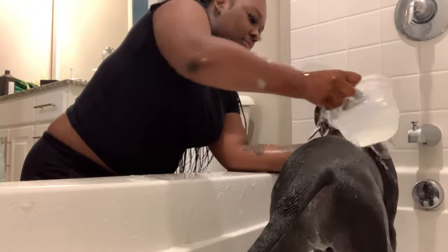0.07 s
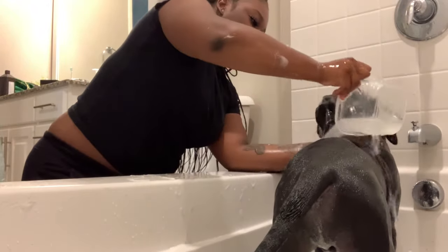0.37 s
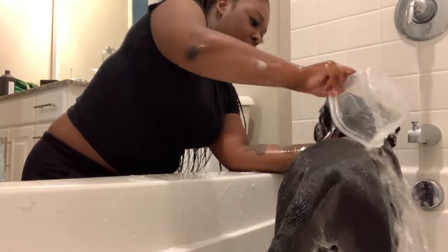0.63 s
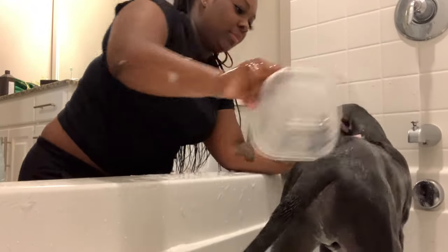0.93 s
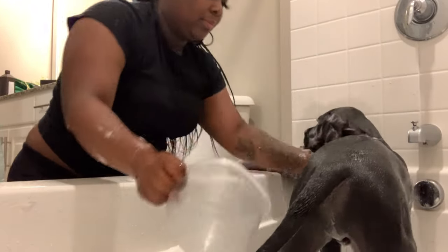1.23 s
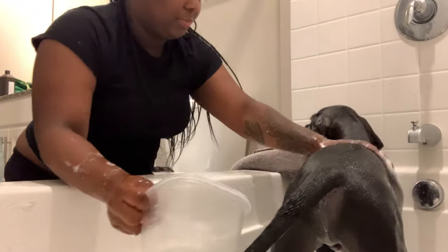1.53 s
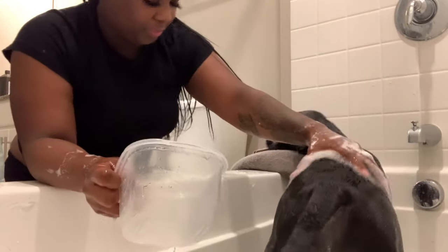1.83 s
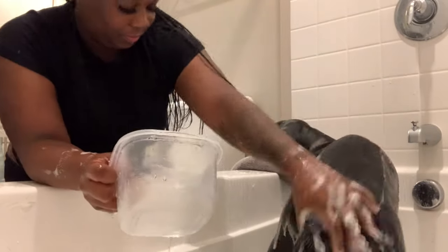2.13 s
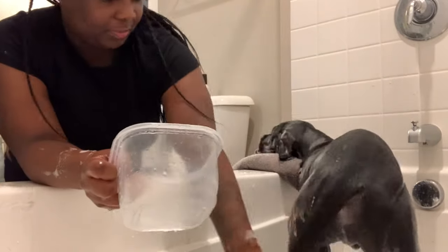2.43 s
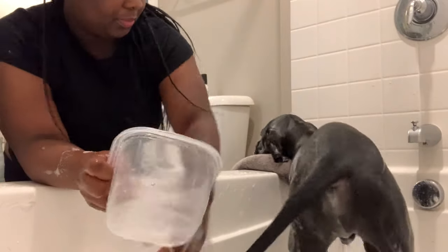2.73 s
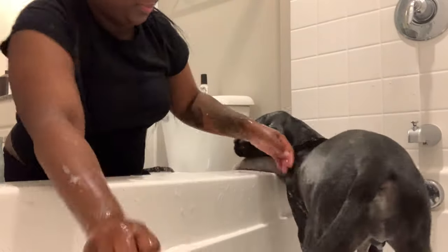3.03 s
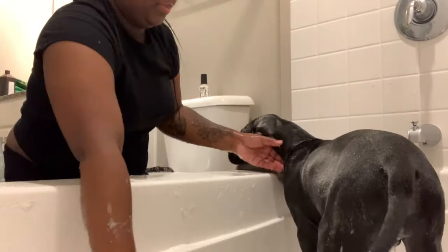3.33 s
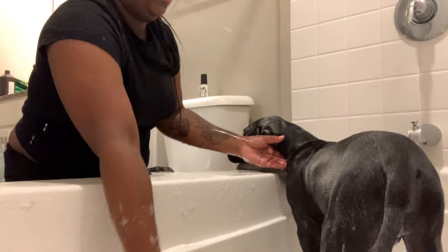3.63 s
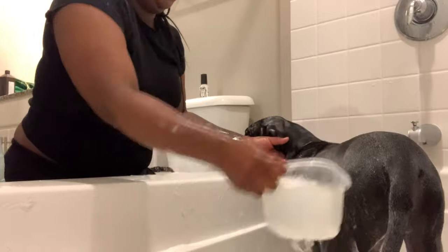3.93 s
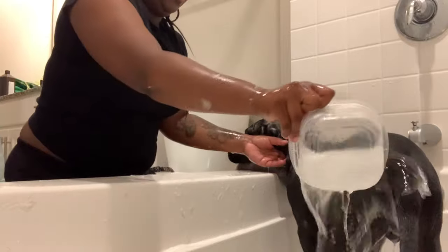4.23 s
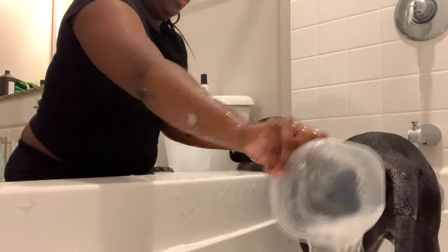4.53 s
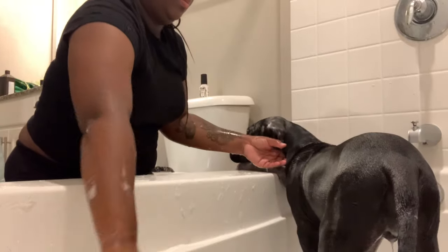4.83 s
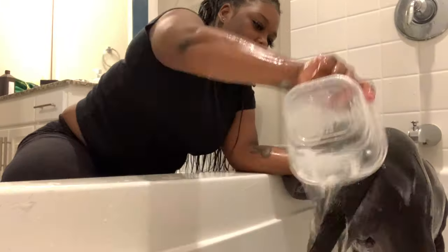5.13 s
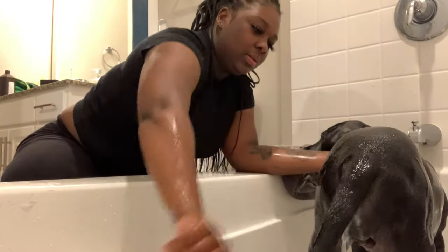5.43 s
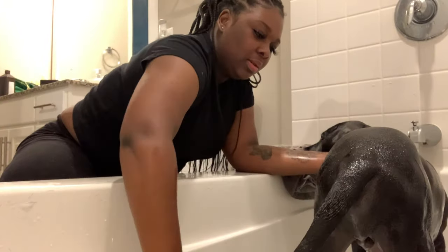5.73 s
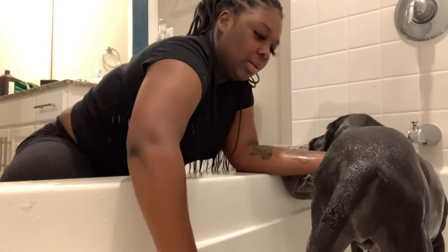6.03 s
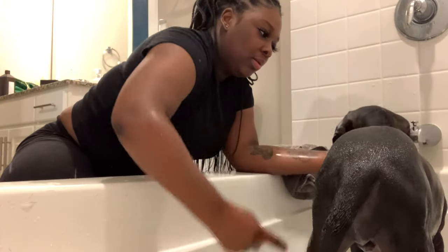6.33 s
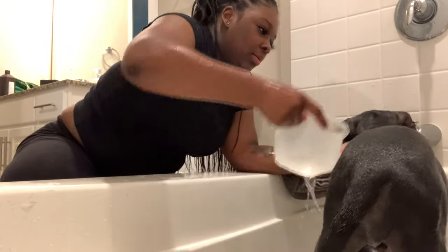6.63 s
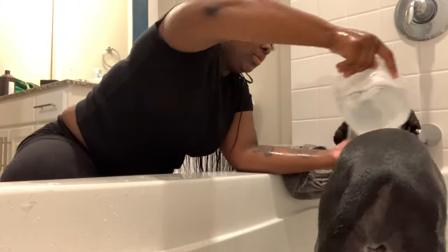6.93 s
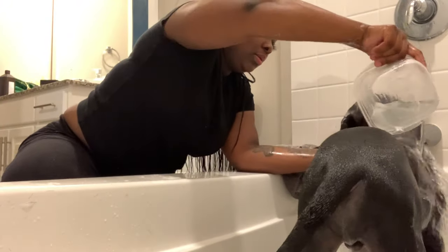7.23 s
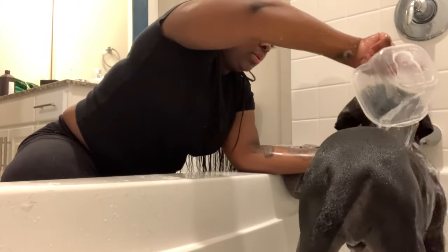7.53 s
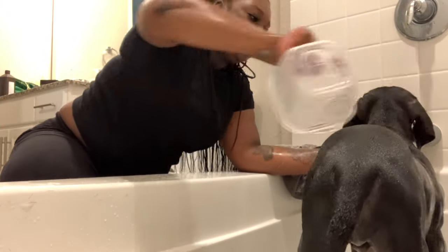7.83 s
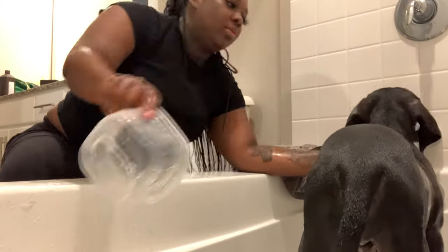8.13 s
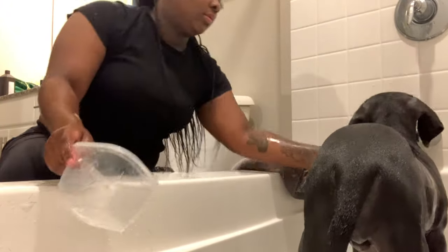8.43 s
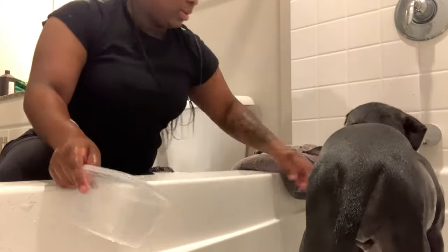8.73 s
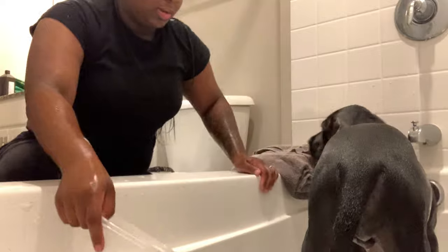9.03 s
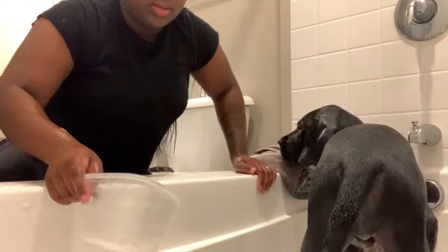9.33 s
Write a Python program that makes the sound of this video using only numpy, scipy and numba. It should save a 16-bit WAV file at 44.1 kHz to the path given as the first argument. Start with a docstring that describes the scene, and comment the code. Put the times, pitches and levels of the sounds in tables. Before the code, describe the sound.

In a small tiled bathroom, a dog is rinsed with three scoopfuls of water, each splashing into the tub with bubbles and fine spray. Between pours come sloshes, plopping drops, light plastic taps and hollow thumps against the bath. From about halfway, the drain gurgles in its pipe. Water trickles off the coat throughout over a steady low rumble of air, picked up close by at the side of the tub.

```python
"""A dog is rinsed in a bathtub in a small tiled room, where the air rumbles and water trickles off its coat.
At 0.4 s a plastic scoop pours water over it: bubbles gurgle and splatter, spray fizzes, the bath drums.
Then a hand and the scoop plunge in, drops plop and tap, and the bumped bath booms. A second pour comes
at 4.2 s, and the level dips briefly at 5 s. By 5.4 s the drain is gulping and ringing its pipe; a last
pour follows at 7 s. Two microphone ports listen from the side of the bath."""
import sys
import numpy as np
from scipy import signal
from scipy.fft import rfft, irfft, next_fast_len
from scipy.io import wavfile
from scipy.ndimage import map_coordinates
from numba import njit

SR = 44100
rng = np.random.default_rng(int(sys.argv[2]) if len(sys.argv) > 2 else 0)


def log_audio(samples):
    """Write samples as a 16-bit WAV file to the path given in sys.argv[1]."""
    # one column per channel
    frames = np.atleast_2d(samples).T
    # limit to full scale, then quantise
    limited = np.clip(frames, -1, 1)
    pcm = np.round(limited * 32767).astype(np.int16)
    wavfile.write(sys.argv[1], SR, pcm)


N = 422478

# tone of the room's air: f/Hz, level/dB
AIR_TONE = [(42, -14), (58, 12), (95, -5), (130, -1.5), (230, -24.5), (900, -8), (1250, -36), (2000, -33),
            (6000, -27), (15000, -32)]
# echo of the tiles: f/Hz, t60/s (t60 is the time a sound takes to fade by 60 dB)
TILE_ECHO = [(100, 0.4), (500, 0.33), (3000, 0.17), (14000, 0.058)]
# notes at which the waste pipe rings: f/Hz, width/Hz, level/dB
PIPE_NOTES = [(154.5, 20, 1), (374.6, 34, -7.5), (488.5, 32, -9), (719, 28, -7), (924, 36, -20),
              (1960, 35, -21)]
# notes at which the bath's shell rings: f/Hz, width/Hz, level/dB
BATH_NOTES = [(59.5, 6.4, 2.5), (97.4, 10.2, 3), (124, 27, -4), (166, 37, -4), (260, 20.5, -5.5),
              (365, 54, -11), (501.5, 18, -9), (734, 50, -12.5)]
# a paw or the scoop bumps the bath: t/s, level/dB, f/Hz
BATH_BUMPS = [(2.21, -24.5, 92.4), (2.437, -20, 83), (4.884, -9, 101.3), (4.95, -15, 110),
              (6.345, -18, 158), (6.594, -22, 173), (7.21, -16.5, 64.4), (8.818, -21, 96)]
# sharp taps of drops and plastic: t/s, level/dB, f/Hz, bright crack/0-1
SHARP_TAPS = [(.419, -12, 4040, 0), (1.676, -30, 1490, 0.5), (3.1, -17, 770, 0.02),
              (3.163, -32, 1500, 0.95), (3.177, -18, 1900, 0.2), (3.5056, -14.5, 1930, 0.01),
              (3.927, -36, 1200, 0.84), (4.8153, -11, 1520, 0.02), (4.849, -18.5, 1880, 0.21),
              (5.273, -8.5, 2370, 0.04), (5.557, -5, 2400, 0.02), (5.787, -9.5, 3070, 0.02),
              (6.379, -17.5, 4170, 0.4), (6.542, -14.5, 2040, 0.09), (7.018, -13.5, 2600, 0.07),
              (7.052, -8.5, 2630, 0.04), (8.258, -28, 2714, 0.26), (9.085, -38, 1390, 0.6),
              (9.335, -21.5, 1870, 0.2)]
# the largest single drops: t/s, level/dB, f/Hz
BIG_DROPS = [(.048, -22, 850), (.216, -10.5, 860), (.821, -17, 488), (.872, -19.5, 650), (1.058, -22, 563),
             (1.28, -22, 770), (1.983, -20.5, 805), (2.156, -14, 1380), (2.183, -12.5, 894),
             (2.294, -20, 1680), (2.377, -5, 1274), (2.553, -21.5, 580), (2.727, -16.5, 346),
             (3.117, -14.5, 430), (3.696, -18, 1620), (4.286, -15.5, 380), (5.374, -20, 323),
             (5.498, -15.5, 415), (6.143, -14, 648), (6.283, -16, 610), (7.425, -13.5, 497)]
# the scoop fills or the stream bores into the water: t/s, length/s, level/dB, f/Hz
BUBBLE_SWARMS = [(.485, .07, -24.5, 904), (2.334, 0.052, -28.5, 1010), (4.507, .15, -30, 266.5),
                 (5.068, 0.056, -30.5, 352), (5.115, 0.083, -27, 1010), (6.673, .065, -27.5, 518),
                 (7.215, 0.12, -27, 365.5), (7.43, 0.31, -36.5, 520)]
# the scoop, a hand or a lump of water hits the surface:
# t/s, slap/dB, bubble f/Hz, t60/s, gulp/dB, spray/dB, place/0-1 (ahead to right)
SURFACE_HITS = [(.366, -16, 378, 0.26, -15.5, -58, 1), (.485, -14, 836, 0.16, -21.5, -51, 0.63),
                (2.407, -14, 1066, .15, -20.5, -39, 0.96), (2.717, -16, 540, 0.18, -21, -70, 0.94),
                (2.972, -27, 1890, 0.22, -36.5, -59, 0.48), (3.101, -20, 553, 0.18, -38, -45, 0.041),
                (3.165, -21, 950, .26, -19.5, -45, 0.16), (4.312, -11, 945, 0.17, -19, -33, 0.77),
                (4.813, -11, 497, 0.24, -2.5, -42, 0.054), (4.89, -12.5, 636, .22, -13, -50, 0.7),
                (5.472, -16, 916, 0.23, -20.5, -39, 0.0018), (5.4972, -9.5, 679, 0.23, -18, -39, 0.26),
                (8.813, -27, 538, 0.092, -21.5, -70, 0.25), (9.334, -29, 620, 0.19, -21, -40.5, 0)]
# a hand, the scoop or the dog stirs the water: t/s, length/s, gurgle/dB, spray/dB, drumming/dB
STIRS = [(0, 0.015, -38.5, -43.5, -37.5), (0.872, 0.11, -42, -44, -38), (1.68, 0.012, -40, -42.5, -57),
         (2.085, 0.16, -47.5, -41.5, -53), (3.205, 0.12, -29.5, -71, -28), (3.549, 0.2, -36, -45, -56),
         (4.127, 0.3, -28.5, -56, -39), (4.606, 0.035, -36, -36, -27), (5.095, 0.22, -32.5, -37.5, -31),
         (5.7, 0.1, -31, -53.5, -29), (6.103, 0.091, -30, -64, -35), (6.283, 0.21, -37.5, -40.5, -37.5),
         (6.738, 0.18, -36, -41, -32.5), (8.508, 0.25, -39, -57, -44.5), (9.288, 0.15, -37.5, -62, -40)]
# water always running off the dog: gurgle/dB, spray/dB, drumming/dB
TRICKLE_LEVELS = (-45.5, -61, -52.5)
# the scoop is emptied over the dog: t/s, length/s, stream/dB, swell/(dB per s), gush t/s, gush/dB
SCOOP_POURS = [(0.41, 0.3, -34.5, 42, 0.44, -25.5), (4.217, 0.24, -34.5, 29, 4.29, -25),
               (7.06, .69, -35, 35, 7.25, -25)]
# tones of big bubbles, small bubbles and fine spray: f/Hz, level/dB
GURGLE_TONE = [(120, -21.5), (270, -4.5), (500, -0.5), (950, 3), (1400, -6), (2500, -15.5), (6000, -28)]
SPLATTER_TONE = [(500, -21), (1200, -1.5), (2000, -1), (3000, -4.5), (4300, -5.5), (7000, -12),
                 (14000, -54)]
SPRAY_TONE = [(1000, -8.5), (3500, 3), (7500, -0.5), (9500, -3), (12000, 0), (15500, 0.5)]
# tone of the stereo centre (mid) and stereo width (side), each with a treble notch: f/Hz, level/dB
MID_TONE = [(200, 2), (1000, 3), (7000, 0.5), (8000, -5.5), (8500, -28.5), (9600, -27), (10500, 2.3)]
SIDE_TONE = [(60, -19.5), (200, -7.5), (500, -4.5), (1200, 2.5), (6500, 0), (9000, 7), (12200, 1.5),
             (13500, -41), (15500, -22)]

RIGHT_LAG_S, AHEAD_LAG_S = 0.00045, 0.00015  # left port's delay: from the dog's end, from nearly ahead
GULP_DELAY_S = 0.0055  # from a slap to the gulp of its hollow
PLOP_CYCLES = 21.2  # vibrations before a drop's bubble dies away


def amp(db):
    """Turn decibels into a gain."""
    return 10 ** (np.asarray(db) / 20)


def unit(x):
    """Scale x to an average strength (rms) of 1."""
    return x / np.sqrt(np.mean(x ** 2) + 1e-20)


def along(points, hz):
    """Read between (f/Hz, value) points on a log frequency axis."""
    f, v = np.transpose(points)
    return np.interp(np.log(hz + 1), np.log(f + 1), v)


def filtered(x, response):
    """Scale and delay each frequency of x by the complex number response(hz)."""
    n = x.shape[-1]
    padded = 2 * next_fast_len(n // 2 + SR // 10)
    return irfft(rfft(x, padded) * response(np.fft.rfftfreq(padded, 1 / SR)), padded)[..., :n]


def coloured(x, points):
    """Give x the tone drawn by (f/Hz, level/dB) points."""
    def response(hz):
        cepstrum = irfft(np.log(amp(along(points, hz))))
        cepstrum[1:len(hz) - 1] *= 2
        cepstrum[len(hz):] = 0  # so nothing rings before its cause
        return np.exp(rfft(cepstrum))
    return filtered(x, response)


def resonate(x, notes):
    """Let x ring a hollow body at its own notes."""
    def response(f):
        return sum((-1) ** k * amp(db) * 1j * f * width / (hz * hz - f * f + 1j * f * width)
                   for k, (hz, width, db) in enumerate(notes))
    return filtered(x, response)


def add(track, s, sound):
    """Mix a sound into a track at s seconds."""
    part = track[..., max(round(s * SR), 0):][..., :sound.shape[-1]]
    part += sound[..., :part.shape[-1]]


def wobble(rate):
    """A smooth random curve through rate points a second."""
    return map_coordinates(rng.standard_normal(int(N * rate / SR) + 4), [np.arange(N) * rate / SR])


def swell(t, start, length, rise_s, fall_s):
    """A level in dB that rises, holds and falls; rise_s and fall_s each span 60 dB."""
    return -60 * (np.maximum(start - t, 0) / rise_s + np.maximum(t - start - length, 0) / fall_s)


def from_right(x, lag):
    """A sound from the right reaches the left port lag seconds late."""
    return filtered(x, lambda hz: np.exp(-2j * np.pi * hz * np.array([[lag], [0]])))


def port_lag(count):
    """The left port's delays in seconds for bubbles spread along the bath."""
    return rng.normal(RIGHT_LAG_S, 0.00013, count)


@njit
def bubbles(n, start, hz, size, t60, rise, lag):
    """Each bubble rings as a pure tone that swells, dies and glides up by the share rise."""
    out = np.zeros((2, n))
    for k in range(len(start)):
        right, left = int(start[k] * SR), int((start[k] + lag[k]) * SR)
        life = int(t60[k] * SR) + 2
        for i in range(min(life, n - max(left, right))):
            age = i / life
            level = size[k] * 2 * (1 - np.exp(-20 * age)) * np.exp(-6.9 * age)
            sample = level * np.sin(2 * np.pi * hz[k] * i / SR * (1 + rise * age / 2))
            out[0, max(left + i, 0)] += sample
            out[1, max(right + i, 0)] += sample
    return out


def bubbling(per_second, low_hz, high_hz, cycles, spread, rise, hiss):
    """An even stream of bubbles over the hiss of ones too small to tell apart."""
    count = int(per_second * N / SR)
    when, pitch, force, life = rng.random((count, 4)).T
    hz = low_hz * (high_hz / low_hz) ** pitch
    size = hz * amp(-spread * np.log(force + 0.01))  # a few are far stronger than the rest
    pops = bubbles(N, when * N / SR, hz, size, cycles * (0.5 + life) / hz, rise, port_lag(count))
    return unit(unit(pops) + hiss * rng.standard_normal((2, N)))


def room_air():
    """The air in the room rumbles steadily."""
    return amp(-40) * unit(coloured(rng.standard_normal((2, N)), AIR_TONE))


def bathroom(x):
    """The tiled walls send each port its own dense echo; the treble dies first."""
    hz, t, noise = signal.stft(rng.standard_normal((2, SR // 2)), SR, nperseg=256)
    fade = amp(-60 * t / along(TILE_ECHO, hz)[:, None])
    echo = signal.istft(noise * fade, SR, nperseg=256)[1]
    echo = np.pad(echo / np.linalg.norm(echo[0]), ((0, 0), (SR // 300, 0)))
    return signal.fftconvolve(x, echo, axes=1)[:, :N]


def drain(full_at_s=5.36):
    """Water gulps unevenly down the drain and rings the waste pipe."""
    gulps = rng.standard_normal(N) * (rng.random(N) < 500 / SR) * amp(3.1 * wobble(rate=14))
    level_db = -38 + swell(np.arange(N) / SR, full_at_s, N / SR, rise_s=2.8, fall_s=1)
    return from_right(amp(level_db) * unit(resonate(gulps, PIPE_NOTES)), RIGHT_LAG_S)


def drips():
    """Stray drops fall at random and plink in the water."""
    return amp(-50) * bubbling(36, low_hz=482, high_hz=3000, cycles=52, spread=3.5, rise=0.11, hiss=0)


def boom(db, hz, t60, sag, sag_s=0.0598):
    """A deep note swells, rings and sinks in pitch by the share sag."""
    t = np.arange(SR // 2) / SR
    phase = 2 * np.pi * hz * np.cumsum(1 - sag * (1 - np.exp(-t / sag_s))) / SR
    return amp(db - 60 * t / t60) * (1 - np.exp(-t / 0.0034)) * np.sin(phase)


def thumps():
    """Air trapped by a splash gulps, sinking in pitch as the hollow deepens; the bumped bath booms."""
    out = np.zeros(N)
    for s, _, bubble_hz, _, gulp_db, _, _ in SURFACE_HITS:
        add(out, s + GULP_DELAY_S, boom(gulp_db, 0.31 * bubble_hz, t60=0.28, sag=0.337))
    for s, db, hz in BATH_BUMPS:
        add(out, s, boom(db, hz, t60=0.31, sag=0))
    return from_right(out, RIGHT_LAG_S)


def taps():
    """A drop or the plastic taps out a few quick vibrations; a hard tap adds a bright crack."""
    out, t = np.zeros(N), np.arange(SR // 20) / SR
    for s, db, hz, bright in SHARP_TAPS:
        age = t * hz / 0.75
        tick = age * np.exp(1 - age) * np.sin(2 * np.pi * hz * t)
        crack = 2.45 * bright * rng.standard_normal(len(t)) * amp(-60 * t / 0.014)
        add(out, s, amp(db + 5.5) * (crack + tick))
    return from_right(out, AHEAD_LAG_S)


def plops(count=5, gap_s=0.014, scatter=0.14, rise=0.14):
    """A drop traps a bubble that chirps upward; ever weaker droplets follow at scattered pitches."""
    out, k = np.zeros((2, N)), np.arange(count)
    lag = np.full(count, RIGHT_LAG_S)
    for s, db, hz in BIG_DROPS:
        start = gap_s * k * (1 + (rng.random(count) - 0.5) / 2)
        pitch = hz * np.exp((k > 0) * rng.normal(0, scatter, count))
        size = amp(db - 9.5 * np.sqrt(k))
        add(out, s, bubbles(SR // 2, start, pitch, size, PLOP_CYCLES / pitch, rise, lag))
    return out


def glugs(count=48, scatter=0.072, climb=0.12):
    """Bubbles of like size swell and fade as one hollow note, which climbs as the air pocket fills."""
    out = np.zeros((2, N))
    for s, length, db, hz in BUBBLE_SWARMS:
        age = (np.arange(count) + rng.random(count)) / count
        pitch = hz * np.exp(rng.normal(0, scatter, count) + climb * (age - 0.5))
        lag = AHEAD_LAG_S + (RIGHT_LAG_S - AHEAD_LAG_S) * rng.random(count)
        size = np.sqrt(np.sin(np.pi * age))
        swarm = bubbles(SR // 2, age * length, pitch, size, 2 * PLOP_CYCLES / pitch, climb, lag)
        add(out, s, amp(db) * swarm / np.sqrt(np.sum(swarm[0] ** 2) / (length * SR)))
    return out


def splashes(count=60):
    """A slap throws a cloud of bubbles: small ones at once, bigger, deeper ones as the hollow closes."""
    out, t = np.zeros((2, N)), np.arange(SR // 2) / SR
    for s, db, hz, t60, _, _, place in SURFACE_HITS:
        age = (np.arange(count) + rng.random(count)) / count
        start = age ** 1.3 * t60 * 0.7
        pitch = hz * np.exp(rng.normal(0, 0.425, count) + 0.5 * np.exp(-age / 0.09) - age)
        cloud = bubbles(len(t), start, pitch, amp(-28 * age), 17 / pitch, 0.22, place * port_lag(count))
        cloud /= np.sqrt(np.mean(cloud[:, :SR // 20] ** 2))
        noise = coloured(rng.standard_normal((2, len(t))), [(100, -10), (hz, 0), (4000, -18), (12000, -34)])
        froth = 0.97 * unit(noise) * amp(-60 * t / t60) * (1 - np.exp(-t / 0.001))
        add(out, s, amp(db - 10.5) * (cloud + froth))
    return out


def flow(runoff_halving_s=0.077):
    """Trickle, pours, stirs and churning add up to three levels in dB: gurgle, spray and drumming."""
    t = np.arange(0, N, 64) / SR
    parts = [[db + np.zeros_like(t) for db in TRICKLE_LEVELS]]
    for s, length, db, db_per_s, gush_s, gush_db in SCOOP_POURS:
        runoff = -20 * np.log10(1 + np.maximum(t - s - length, 0) / runoff_halving_s)
        stream = -db_per_s * np.maximum(s - t, 0) + runoff
        drumming = db - 0.5 + 1.4 * stream  # only a heavy stream drums
        parts.append([db + 1.5 + stream, db + stream, drumming])
        gush = gush_db + swell(t, gush_s, 0, rise_s=0.51, fall_s=1.63)  # most of the water lands
        parts.append([gush, np.full_like(t, -np.inf), gush - 3])
    for s, length, *levels in STIRS:
        parts.append(np.add.outer(levels, swell(t, s, length, rise_s=0.42, fall_s=0.75)))
    for s, slap_db, _, _, gulp_db, spray_db, _ in SURFACE_HITS:
        churn = swell(t, s + GULP_DELAY_S, length=0.04, rise_s=0.03, fall_s=0.42)
        parts.append(np.add.outer([slap_db - 21.5, spray_db, gulp_db - 14.5], churn))
    powers = np.sum(amp(parts) ** 2, axis=0)
    return [np.interp(np.arange(N) / SR, t, 10 * np.log10(power)) for power in powers]


def pouring():
    """Water runs off the dog: big bubbles gurgle, small ones splatter, spray fizzes, the bath drums."""
    gurgle_db, spray_db, drum_db = flow()
    splatter_db = 0.51 * gurgle_db + 0.5 * spray_db  # middling drops follow both
    big = bubbling(340, low_hz=240.7, high_hz=2170, cycles=37.5, spread=2.5, rise=0.14, hiss=0.21)
    small = bubbling(1500, low_hz=1022, high_hz=4736, cycles=39, spread=2.4, rise=0.086, hiss=0.99)
    fine = bubbling(1800, low_hz=2760, high_hz=15800, cycles=1.7, spread=2.5, rise=0, hiss=0.97)
    gurgle = amp(gurgle_db + 1) * unit(coloured(big, GURGLE_TONE))
    splatter = amp(splatter_db + 2.05) * unit(coloured(small, SPLATTER_TONE))
    spray = amp(spray_db + 2.5) * unit(coloured(fine, SPRAY_TONE))
    blows = rng.standard_normal(N) * (rng.random(N) < 220 / SR)  # water hits the bath's floor
    drum = amp(drum_db) * unit(resonate(blows, BATH_NOTES))
    lumps = amp(2.25 * wobble(rate=60))  # the stream breaks up as it falls
    return lumps * (gurgle + splatter + spray) + drum


def scene():
    """All the water and its echo, over the rumble of the air."""
    booms = thumps()
    water = pouring() + drain() + drips() + splashes() + taps() + plops() + glugs()
    air = room_air()
    return water + booms + bathroom(amp(-7) * water + amp(-21) * booms) + air


def record(dry, top_hz=15850):
    """The stereo sound is narrow in the bass and wide and hollow near 9 kHz."""
    mid = coloured((dry[0] + dry[1]) / 2, MID_TONE)
    side = coloured((dry[0] - dry[1]) / 2, SIDE_TONE)
    bass_cut = signal.butter(3, 42, "highpass", fs=SR, output="sos")
    pair = signal.sosfilt(bass_cut, [mid + side, mid - side])
    pair *= amp(np.interp(np.arange(N) / SR, [5.022, 5.033, 5.048], [0, -21, 0]))  # a brief dip in level
    pair /= (1 + (pair / 0.93) ** 6) ** (1 / 6)  # the loudest peaks are rounded off
    return filtered(pair, lambda hz: hz < top_hz)


dry = scene()
out = record(dry)
log_audio(out)
```